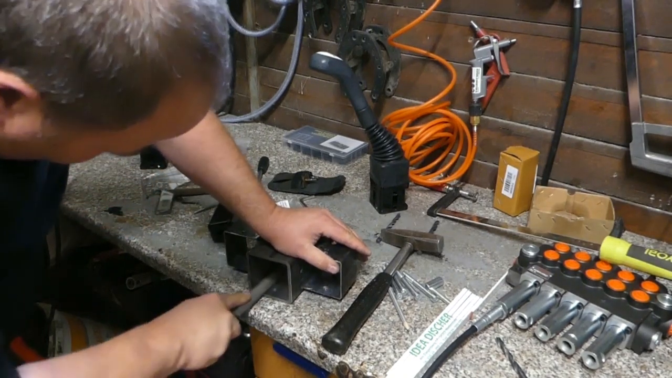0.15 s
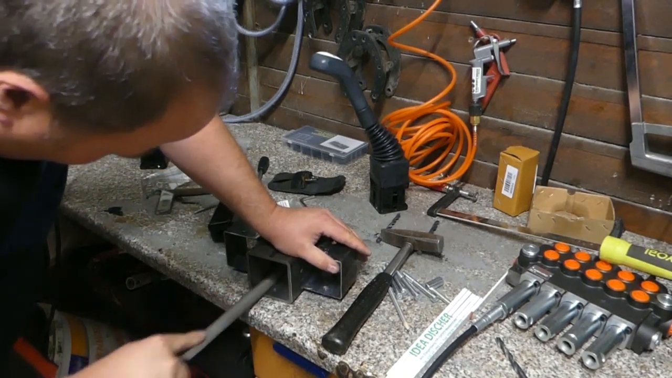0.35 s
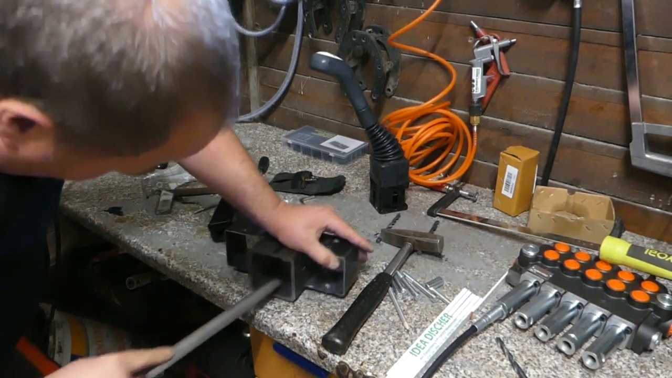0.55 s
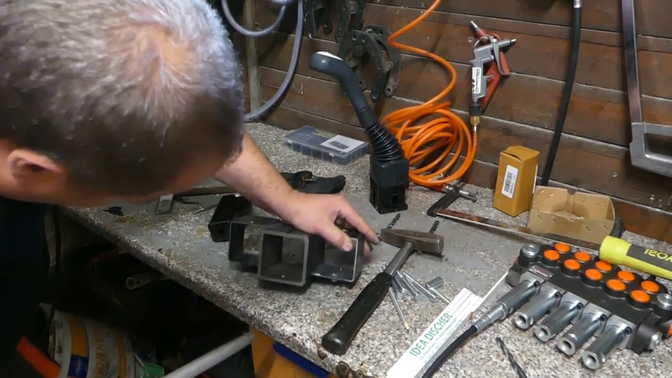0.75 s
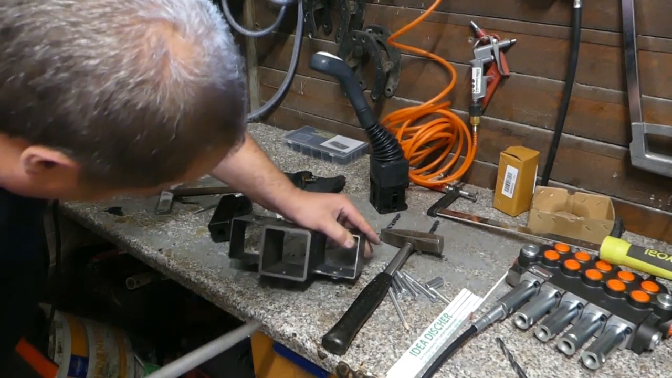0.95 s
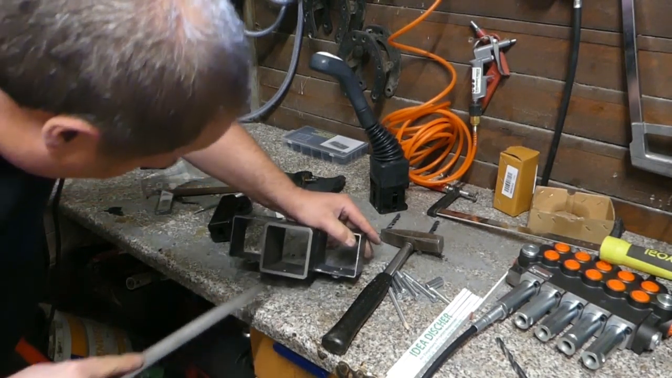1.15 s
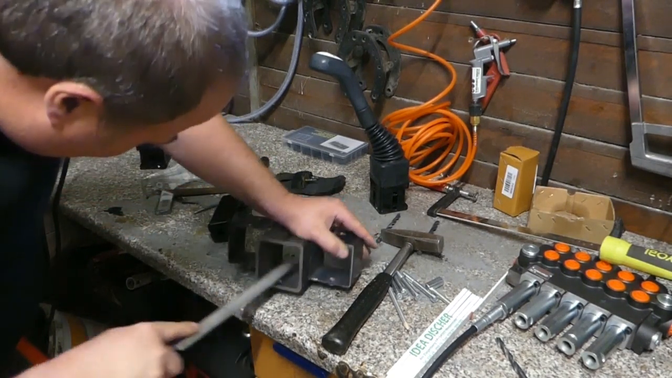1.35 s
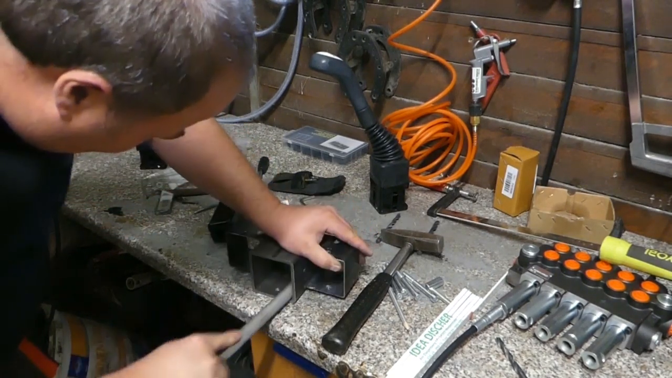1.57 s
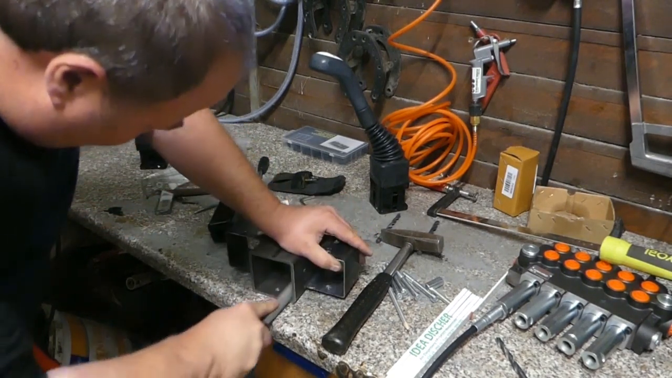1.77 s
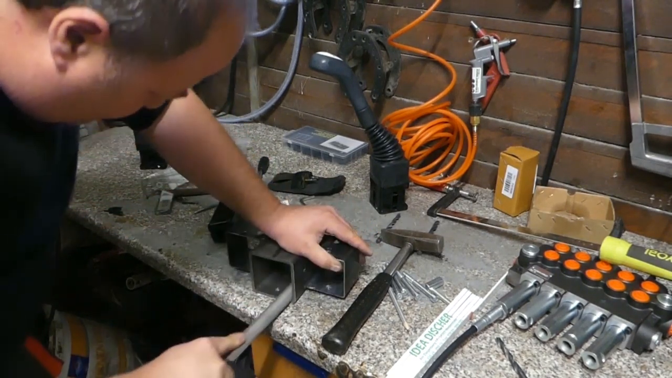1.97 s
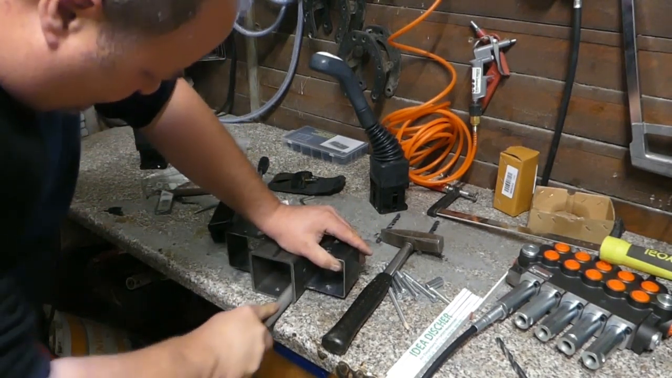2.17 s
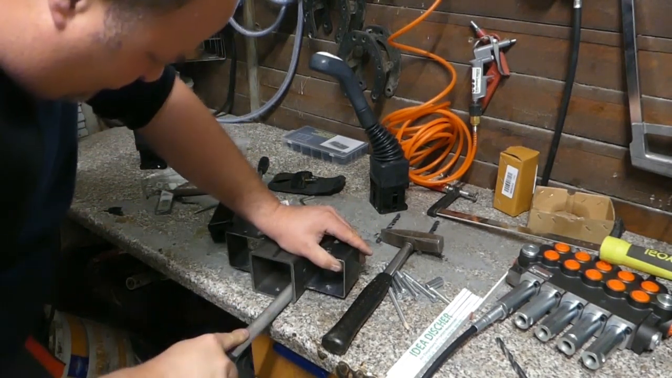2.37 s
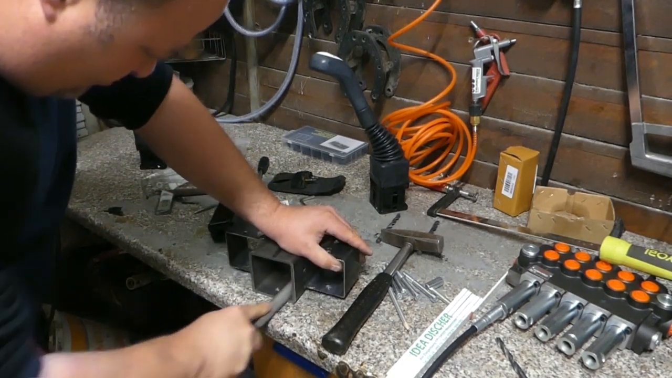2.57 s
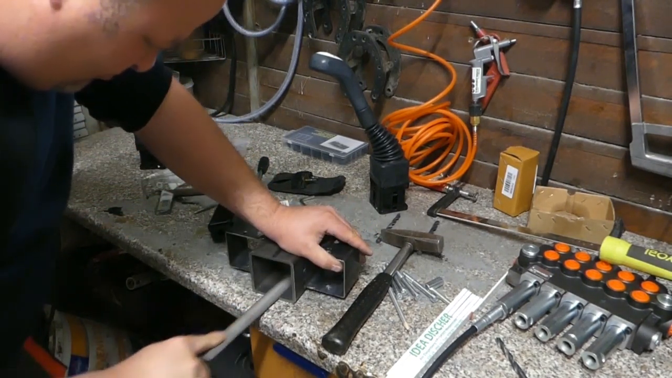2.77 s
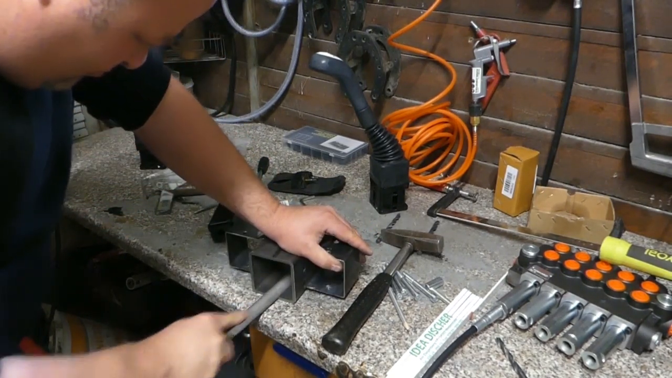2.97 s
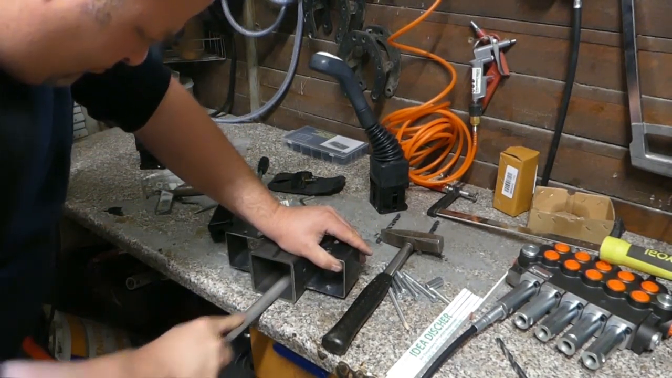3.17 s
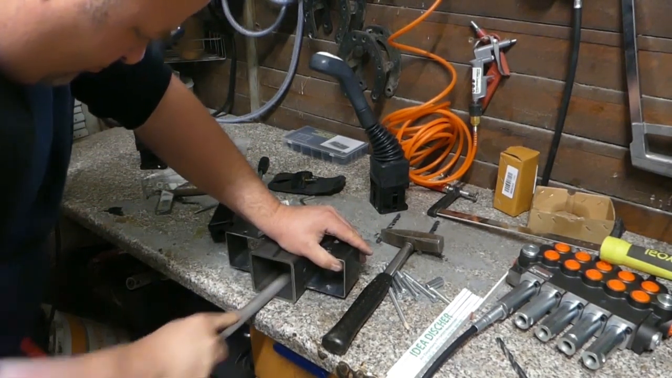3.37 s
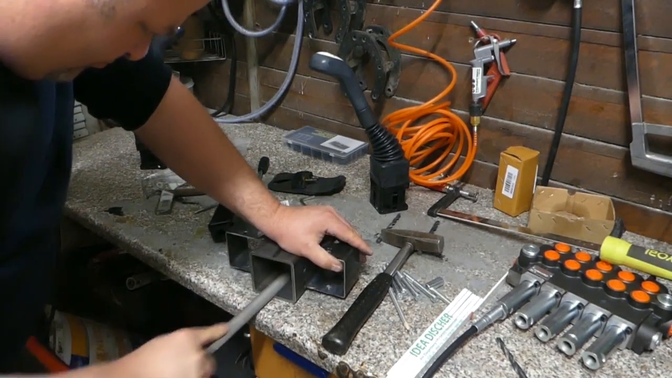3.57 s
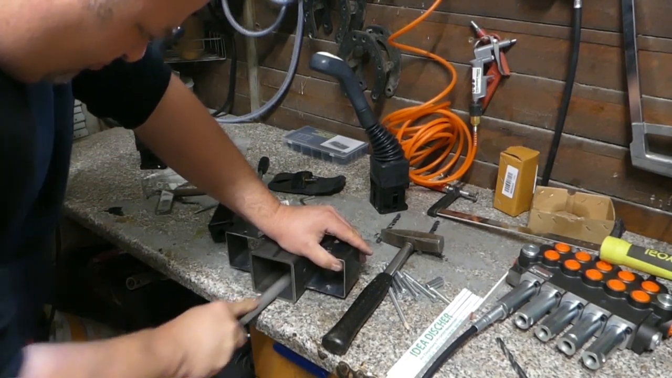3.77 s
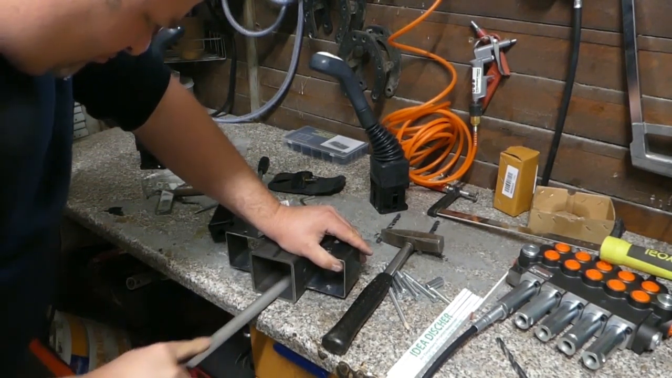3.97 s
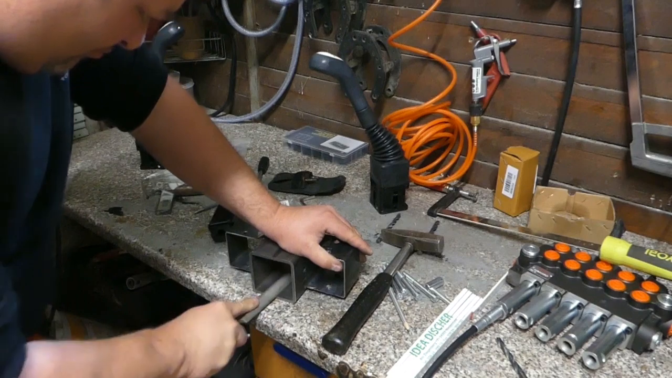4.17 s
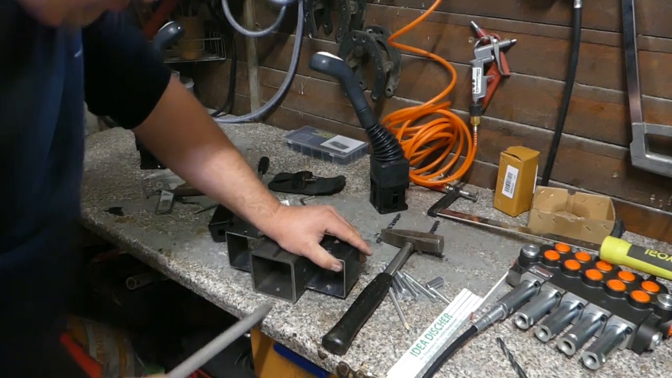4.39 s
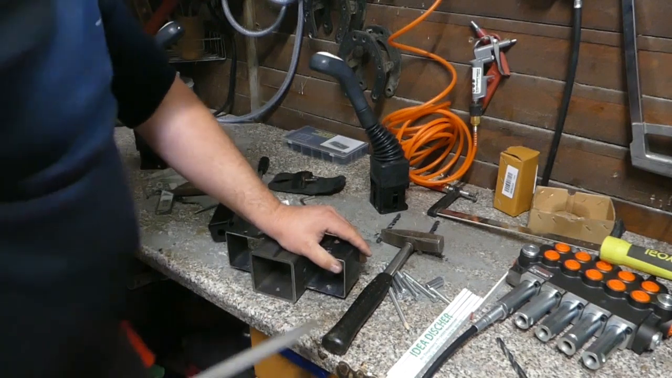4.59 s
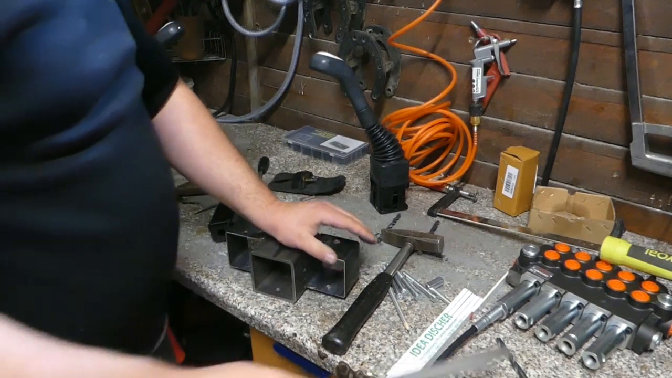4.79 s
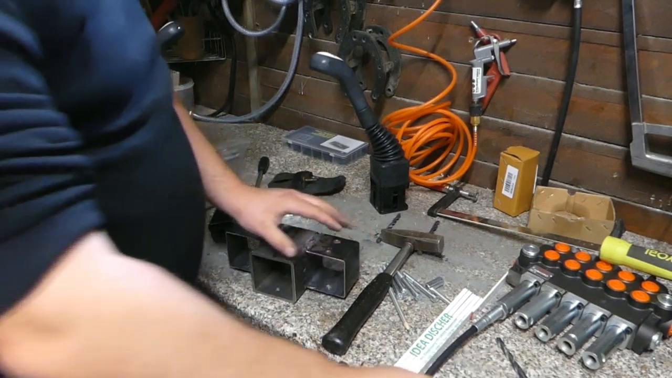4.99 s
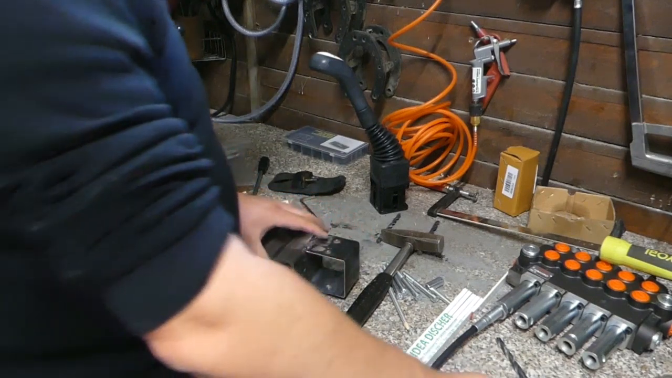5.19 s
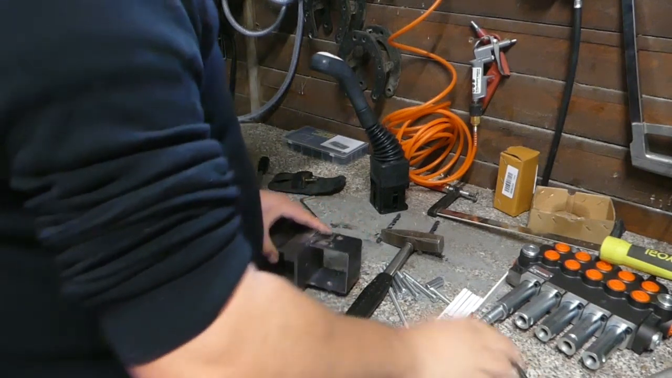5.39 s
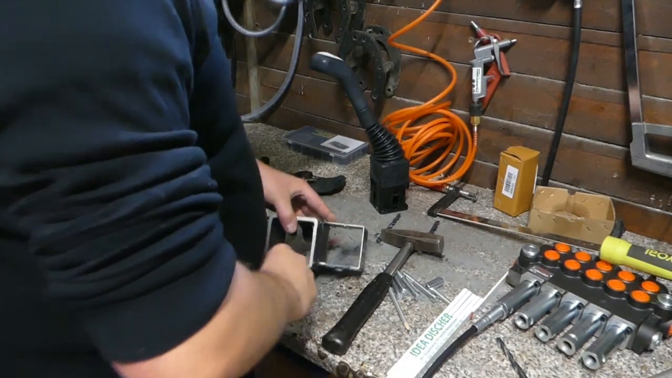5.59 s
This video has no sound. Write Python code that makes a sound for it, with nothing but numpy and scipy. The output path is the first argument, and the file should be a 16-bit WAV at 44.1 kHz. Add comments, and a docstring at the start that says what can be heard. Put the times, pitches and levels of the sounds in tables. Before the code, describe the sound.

Close stereo sound of filing at a workbench: a few harsh strokes, a near-silent gap, a sharp steel clink, then about three seconds of rhythmic bright rasping with gliding squawks and brief squeals. The filing stops with a tap and thin ring. Sleeves rustle, the file is set down with a clatter, and the tube scrapes round and knocks over. Short room echo, faint hum and hiss.

```python
"""Filing a square steel tube

Small workshop, close walls, in stereo: a hand file rasps back and forth inside a tube held on a workbench.
Its teeth, as noise and uneven pulses, chatter at the speed of the stroke and feed the tube's resonances.
The file clinks on the tube, as bursts of contact noise through ringing modes, and its tip slips off at the end.
Then the file is laid down, and the tube is dragged round, juddering, and tipped over on the bench."""
import sys
import numpy as np
from scipy import signal
from scipy.fft import rfft, irfft, next_fast_len
from scipy.io import wavfile
from scipy.ndimage import uniform_filter1d, map_coordinates

SR = 44100
rng = np.random.default_rng(int(sys.argv[2]) if len(sys.argv) > 2 else 0)


def persist_wave(psi):
    """Save psi, clipped to +-1, as 16-bit WAV."""
    counts = np.round(np.clip(psi, -1, 1) * 32767).astype(np.int16)
    wavfile.write(sys.argv[1], SR, np.atleast_2d(counts).T)


N = 248724  # samples

# All table levels are relative: each layer also has a gain where it is mixed.


def amp(db):
    """Amplitude factor of a level in dB."""
    return 10 ** (np.asarray(db) / 20)


def unit(x):
    """x scaled to an RMS of one."""
    return x / np.sqrt(np.mean(x ** 2) + 1e-20)


def along(points, hz):
    """Reads (Hz, value) points on a log frequency axis."""
    f, v = np.transpose(points)
    return np.interp(np.log(hz + 1), np.log(f + 1), v)


def wobble(rate):
    """A smooth random curve, rate knots a second."""
    knots = rng.standard_normal(int(N * rate / SR) + 4)
    return map_coordinates(knots, [np.arange(N) * rate / SR], order=2)


def filtered(x, response):
    """x with its spectrum multiplied by a response of frequency."""
    m = next_fast_len(N + SR // 2)
    return irfft(rfft(x, m) * response(np.fft.rfftfreq(m, 1 / SR)), m)[..., :N]


def coloured(x, points):
    """Causal (minimum-phase) filter of unit energy with the given spectrum."""
    size = 4096
    cepstrum = irfft(np.log(amp(along(points, np.fft.rfftfreq(size, 1 / SR)))))
    # folding the cepstrum forward puts the energy at the start of the kernel
    cepstrum[1:size // 2] *= 2
    cepstrum[size // 2 + 1:] = 0
    kernel = irfft(np.exp(rfft(cepstrum)))
    return signal.fftconvolve(x, kernel / np.linalg.norm(kernel))[:N]


def mode(x, hz, width):
    """One resonance with a peak gain of one; width in Hz."""
    return signal.lfilter(*signal.iirpeak(hz, hz / width, SR), x)


def bank_power(modes):
    """Approximate power of white noise through (Hz, width Hz, dB) resonances."""
    return sum(amp(db) ** 2 * np.pi * width / SR for hz, width, db in modes)


def resonate(x, modes):
    """A bank of resonances with alternating signs that keeps the power of white noise."""
    ringing = sum((-1) ** k * amp(db) * mode(x, hz, width) for k, (hz, width, db) in enumerate(modes))
    return ringing / np.sqrt(bank_power(modes))


def rubbed(x, modes, wander_db):
    """As the contact point travels, each mode is fed more or less from moment to moment."""
    ringing = sum(amp(db) * mode(x * amp(wander_db * wobble(8.7)), hz, width) for hz, width, db in modes)
    return ringing / np.sqrt(bank_power(modes))


def sustained(x):
    """Friction feeds a weak ring and damps a strong one, which evens out its strength."""
    power = np.abs(uniform_filter1d(x ** 2, size=1500)) + 1e-9
    return unit(x / power ** .3)


def pulses(rate, jitter, scatter_db):
    """One uneven pulse each time the running count passes a whole number."""
    count = np.cumsum(rate * np.exp(jitter * wobble(350))) / SR
    at = np.flatnonzero(np.diff(np.floor(count)))
    train = np.zeros(N)
    train[at] = amp(scatter_db * rng.standard_normal(N)[at]) / np.sqrt(rate[at])
    return unit(train - uniform_filter1d(train, SR // 100))


def grit(rough_db):
    """Noise that comes in tiny irregular bursts."""
    return unit(rng.standard_normal(N) * amp(rough_db * (wobble(900) + wobble(140))))


def blows(rows, t60, push):
    """For each (s, dB) row, a clean push and a short burst of contact noise that fades 60 dB in t60 seconds."""
    force, t = np.zeros(N + SR), np.arange(SR // 3) / SR
    for s, db in rows:
        fade = amp(db - 60 * t / t60)
        force[round(s * SR):][:len(t)] += fade * rng.standard_normal(len(t))
        force[round(s * SR)] += push * np.linalg.norm(fade)
    return force[:N] / np.hypot(1, push)


def swing(start, rise, fall):
    """An arm's speed, 0 to 1 and back: a quarter sine up, a quarter sine down."""
    ramp = np.interp(np.arange(N) / SR, [start, start + rise, start + rise + fall], [0, 1, 0])
    return np.sin(np.pi / 2 * ramp)


# spectrum of the workshop air: [f/Hz, level/dB]
AIR_COLOUR = [(25, -49), (60, -37), (120, -23), (180, 3.5), (225, -13), (270, -3), (420, -13.5),
              (800, -19.5), (3000, -31), (16000, -35.5)]


def background():
    """The workshop's low steady drone and faint hiss: coloured noise spread over both channels."""
    mid, side = (coloured(rng.standard_normal(N), AIR_COLOUR) for _ in range(2))
    return amp(-53) * (mid + amp(-2.5) * side * np.array([[1], [-1]]))


# how long the room rings: [f/Hz, t60/s]
ROOM_T60 = [(100, 0.88), (500, 0.46), (2500, 0.5), (6000, 0.32), (14000, 0.25)]
# stereo width of the room echo: [f/Hz, side-against-mid level/dB]
ROOM_WIDTH = [(100, 0), (250, -12.5), (700, -5.5), (2200, -5), (4200, -8.5), (8000, -13.5), (13000, 0.5)]


def workshop(x):
    """Close walls answer at once; each frequency dies at its own speed, nearly alike in both ears."""
    hz, t, z = signal.stft(rng.standard_normal((2, SR * 2 // 3)), SR, nperseg=256)
    fade = amp(-60 * t / along(ROOM_T60, hz)[:, None])
    tail = signal.istft(z * fade, SR, nperseg=256)[1]
    tail = tail / np.linalg.norm(tail[0])
    delayed = np.pad(x, (SR // 300, 0))  # 1/300 s to the first echo
    mid, side = signal.fftconvolve(delayed[None], tail, axes=1)[:, :N]
    return mid + filtered(side, lambda hz: amp(along(ROOM_WIDTH, hz))) * np.array([[1], [-1]])


# hands and sleeves moving: [start t/s, rise t/s, fall t/s, level/dB]
RUSTLE_MOVES = [(.87, 0.025, .06, -60), (1.2, 0.39, .04, -60), (4.78, 0.12, 0.074, -50),
                (4.97, 0.026, 0.14, -51.5), (5.14, 0.032, 0.086, -48.5)]
# spectrum of the rustle: [f/Hz, level/dB]
RUSTLE_COLOUR = [(200, -27), (500, -19), (1100, -2.5), (4600, -5.5), (15000, -16)]


def handling():
    """A soft rustle of hands and sleeves, as bursty noise, between and after the strokes."""
    level = sum(amp(db) * swing(s, rise, fall) for s, rise, fall, db in RUSTLE_MOVES)
    return amp(-2) * level * coloured(grit(rough_db=0.5), RUSTLE_COLOUR)


# tube shoved round on the bench: [t/s, level/dB, judder f/Hz]
TUBE_SHOVES = [(5.139, -42, 640), (5.25, -22.5, 799.3), (5.36, -28.5, 764), (5.493, -23.5, 787.5)]
# spectrum of the drag: [f/Hz, level/dB]
DRAG_COLOUR = [(100, -49), (250, -28), (440, 0), (600, -2.5), (780, -18), (1100, -1), (2000, -25),
               (3400, -41), (5400, -17), (15000, -54)]
SHOVE_ATTACK_S, SHOVE_FADE_DB_PER_S = .02, 96


def sliding():
    """Each shove starts the tube juddering over the gritty bench top, then dies away."""
    t = np.arange(N) / SR

    def shove(s, db):
        attack = np.clip((t - s) / SHOVE_ATTACK_S, 0, 1)
        return attack * amp(db - SHOVE_FADE_DB_PER_S * np.maximum(t - s - SHOVE_ATTACK_S, 0))

    shoves = np.array([shove(s, db) for s, db, _ in TUBE_SHOVES])
    # the strongest shove sets the judder
    judder_hz = np.array([hz for _, _, hz in TUBE_SHOVES])[shoves.argmax(axis=0)]
    judder = unit(mode(pulses(judder_hz, jitter=0.055, scatter_db=4.0), 800, 223))
    scrape = coloured(grit(rough_db=-5.0), DRAG_COLOUR)
    return shoves.max(axis=0) * (amp(-5) * scrape + amp(-3.5) * judder)


# tube knocks on the bench: [t/s, dull thud level/dB, hard clack level/dB]
BENCH_KNOCKS = [(.437, -28.5, -22.5), (1.337, -36, -45), (1.557, -18.5, -22.5), (1.567, -17, -17.5),
                (1.621, -24, -45), (2.747, -48, -22.5), (5.148, -40, -60), (5.481, -19.5, -12.5),
                (5.486, -14, -9.5), (5.514, -38, -11), (5.539, -29, -14), (5.57, -28, -16.5),
                (5.587, -32, -22.5)]
# spectra of the thud and of the clack: [f/Hz, level/dB]
THUD_COLOUR = [(40, -44.5), (90, -15), (170, 3), (330, 1), (520, 4), (900, -21), (1600, -24), (3000, -48),
               (8000, -56), (16000, -75)]
CLACK_COLOUR = [(80, -39), (170, -20), (250, -5), (430, 3), (600, -2.5), (800, 8.5), (1300, 0.5),
                (2300, -6), (3500, -17), (6000, -26.5), (10000, -30.5), (16000, -44)]


def knocks():
    """The tube's edges drop on the bench top, which answers with a thud."""
    thuds = [(s, db) for s, db, _ in BENCH_KNOCKS]
    clacks = [(s, db) for s, _, db in BENCH_KNOCKS]
    thud = coloured(blows(thuds, t60=0.046, push=0.41), THUD_COLOUR)
    clack = coloured(blows(clacks, t60=0.026, push=0.45), CLACK_COLOUR)
    return thud + clack


# file laid down: [t/s, level/dB]
LANDINGS = [(5.25, -12.5)]
# modes of blade and bench together: [f/Hz, width/Hz, level/dB]
BLADE_MODES = [(812, 16, 2), (1084, 42, -9), (1470, 380, -11.5), (2920, 300, -13.5), (4160, 120.6, -5),
               (5330, 100, -5), (6850, 170, -8), (8120, 50, -11), (9480, 80, -15)]
# spectrum of the hard crack of file on bench or tube: [f/Hz, level/dB]
CRACK_COLOUR = [(150, -22), (500, -4.5), (1500, -18), (2400, -21), (4200, 7), (7000, -0.5), (9000, 0),
                (13000, -8), (16000, -12)]


def file_laid_down():
    """The blade lands on the bench with a brief clatter: contact noise into the modes of blade and bench."""
    ring = amp(5) * resonate(blows(LANDINGS, t60=0.028, push=0.45), BLADE_MODES)
    crack = amp(-8) * coloured(blows(LANDINGS, t60=0.039, push=0.067), CRACK_COLOUR)
    return ring + crack + amp(-10) * coloured(blows(LANDINGS, t60=0.14, push=0.49), CLACK_COLOUR)


# file tip slips off the tube: [t/s, level/dB]
TIP_RELEASE = [(4.519, -5)]
# modes of that tap: [f/Hz, width/Hz, level/dB]
TIP_MODES = [(460, 67, -7), (880, 40, 4.5), (955, 52, 0.5), (1408, 100, -1.5), (1597, 75, 4.5),
             (2440, 37.3, 4.5)]
FREE_BLADE_HZ = 4652


def release():
    """The tip taps the tube's mouth on its way out; the freed blade rings on."""
    age = np.maximum(np.arange(N) / SR - TIP_RELEASE[0][0], 0)
    blade = amp(-32 - 60 * age / 0.88) * np.sin(2 * np.pi * FREE_BLADE_HZ * age)
    return amp(-2.5) * resonate(blows(TIP_RELEASE, t60=0.025, push=0.93), TIP_MODES) + blade


# high ringing modes of tube and file: [f/Hz, level/dB]
STEEL_RING = [(2891, -49), (3036, -52), (3117, -50), (3510, -49), (3575, -53), (3833, -49), (4107, -50),
              (4355, -50), (4420, -48), (4587, -47), (4651, -45), (4958, -49), (5270, -47), (5690, -46),
              (6379, -48), (6756, -49), (7106, -49), (7617, -57), (8672, -54), (8920, -53), (9098, -50),
              (9410, -57), (11036, -57), (11230, -56), (11773, -58), (12398, -60), (13889, -63)]


def steel_modes():
    """The ringing modes; the higher ones are wider."""
    return [(hz, 8 + hz / 500, db) for hz, db in STEEL_RING]


# file strikes the tube: [t/s, level/dB]
FILE_CLINKS = [(1.5207, -1.5), (1.5304, -12.5), (2.1275, -7.5), (2.1382, -15)]
# broad resonances of the hand-damped tube walls, also rung by the filing: [f/Hz, width/Hz, level/dB]
WALL_MODES = [(2073, 30, -5), (2272, 22, -9), (2355, 26, -1), (2400, 34, -2), (2486, 42, -2)]


def clinks():
    """The file hits the tube: a hard crack, then the walls and the modes ring."""
    crack = amp(-5.0) * coloured(blows(FILE_CLINKS, t60=0.033, push=0.052), CRACK_COLOUR)
    force = blows(FILE_CLINKS, t60=0.017, push=0.59)
    return crack + amp(-15.0) * resonate(force, steel_modes()) + resonate(force, WALL_MODES)


# one mode grips the stroke and squeals briefly: [t/s, half length t/s, f/Hz, width/Hz, level/dB]
SQUEAL_SWELLS = [(0.026, 0.03, 1038, 6.3, -36), (0.147, 0.07, 1250, 3.7, -32), (0.52, 0.1, 3820, 40, -46),
                 (2.966, 0.026, 3480, 7.7, -27), (3.111, 0.017, 3710, 560, -23.5),
                 (3.299, 0.024, 3530, 34.6, -28.5), (3.576, 0.016, 1251, 16.6, -31)]


def squeals():
    """Short swells of a single resonance, fed with noise and evened out."""
    t = np.arange(N) / SR
    total = 0
    for s, half_length, hz, width, db in SQUEAL_SWELLS:
        swell = np.exp(-((t - s) / half_length) ** 2 / 2)
        total = total + amp(db) * swell * sustained(mode(rng.standard_normal(N), hz, width))
    return total


# the teeth catch evenly in a gliding squawk:
# [start t/s, length t/s, from f/Hz, to f/Hz (both before the waver), level/dB]
SQUAWK_GLIDES = [(.32, 0.14, 721, 1175, -21.5), (2.009, 0.096, 989, 1094, -25),
                 (2.708, 0.071, 700, 1109, -22), (2.754, .12, 1380, 1350, -27),
                 (2.934, 0.056, 1336, 1255, -31.5), (2.974, .085, 1077, 782, -24),
                 (3.235, 0.063, 738, 972, -19), (3.282, 0.1114, 1342, 1169, -25),
                 (3.68, .09, 1704, 1300, -23.5), (3.751, .09, 930, 751, -22.5),
                 (4.09, 0.071, 620, 662.4, -29), (4.162, 0.11, 1300, 718, -21.5),
                 (4.336, 0.061, 1050, 1250, -27)]


def squawks():
    """Teeth that catch evenly give a rough tone that swells, glides and fades."""
    t = np.arange(N) / SR
    waver = np.exp(.075 * wobble(450))
    catching = unit(amp(3 * wobble(200) + 2 * wobble(45)))
    tones = 0
    for s, length, from_hz, to_hz, db in SQUAWK_GLIDES:
        glide_hz = np.interp(t, [s, s + length], [from_hz, to_hz])
        tone = np.sqrt(2) * np.sin(2 * np.pi * np.cumsum(glide_hz * waver) / SR)
        tones = tones + amp(db) * swing(s, length / 2, length / 2) * tone
    return catching * tones


# the file leans on the edge and keeps grating: [from t/s, to t/s]
LEANING = [(0.0, .5), (1.56, 4.44)]
LIFT_DB_PER_S = 88  # fade as the file is lifted off


def contact():
    """One while the file leans on the tube, fading as it is lifted."""
    t = np.arange(N) / SR
    return sum((t >= on) * amp(-LIFT_DB_PER_S * np.maximum(t - off, 0)) for on, off in LEANING)


# one row per push or pull of the file; the last only shapes the fade as filing ends:
# [start t/s, speeding up t/s, slowing down t/s, rasp level/dB, tube ring level/dB, chatter level/dB]
FILE_STROKES = [ (-0.04, .025, 0.13, -21, -18.5, -38), (0.11, .087, 0.13, -19.5, -22, -29.5),
                (0.295, .125, 0.092, -23, -18.5, -25), (0.563, .021, 0.11, -36.5, -39, -47),
                (0.755, .035, 0.15, -55, -66, -48.5), (1.661, .075, .17, -23, -15, -29),
                (1.922, .062, 0.13, -20.5, -15.5, -29), (2.124, .025, .16, -22.5, -17.5, -29),
                (2.32, .091, .09, -27.5, -22, -26), (2.526, .041, 0.093, -20.5, -16, -31),
                (2.671, .093, 0.13, -22, -14, -27), (2.892, .056, 0.12, -23, -14, -31),
                (3.06, .058, 0.083, -22, -13.5, -33), (3.225, .084, 0.13, -22, -12, -34),
                (3.422, .05, .157, -22.5, -16, -37), (3.649, .053, 0.16, -19.5, -15.5, -35.5),
                (3.85, .109, 0.12, -22.5, -16, -37), (4.099, .086, 0.11, -20.5, -16.5, -34.5),
                (4.301, .132, 0.11, -21.5, -15, -35), (4.454, .048, 0.17, -31, -31.5, -35), ]
RASP_LAW, RING_LAW, CHATTER_LAW = 1.42, 1, 0.89  # strength goes as speed to this power
REST_RASP_DB, REST_RING_DB, REST_CHATTER_DB = -34, -30.5, -37.5
TOOTH_HZ = 1150  # teeth passing the edge per second at full speed, before jitter
TURN_SHARE = .35  # share of the top tooth rate that is left as the file turns round


def stroking():
    """The file's speed sets the strength of rasp, ring and chatter, and the rate of the teeth."""
    speed = np.array([swing(*row[:3]) for row in FILE_STROKES])
    rasp_db, ring_db, chatter_db = np.transpose(FILE_STROKES)[3:]
    resting = contact()
    rasp = np.hypot(amp(rasp_db) @ speed ** RASP_LAW, amp(REST_RASP_DB) * resting)
    ring = np.hypot(amp(ring_db) @ speed ** RING_LAW, amp(REST_RING_DB) * resting)
    chatter = np.hypot(amp(chatter_db) @ speed ** CHATTER_LAW, amp(REST_CHATTER_DB) * resting)
    tooth_hz = TOOTH_HZ * (TURN_SHARE + (1 - TURN_SHARE) * speed.max(axis=0))
    return rasp, ring, chatter, tooth_hz


def brightened(x, level, hard_db, slope):
    """A harder stroke gains more at the top of the treble than below it."""
    top = filtered(x, lambda hz: np.clip((hz - 8000) / 4000, 0, 1))
    return x + top * ((level / amp(hard_db)) ** slope - 1)


def shimmer(x, t60):
    """The countless high modes of steel, as a short dense ring of fading noise."""
    t = np.arange(SR // 4) / SR
    ring = rng.standard_normal(len(t)) * amp(-60 * t / t60)
    return signal.fftconvolve(x, ring / np.linalg.norm(ring))[:N]


# spectra of the rasp and of the chatter: [f/Hz, level/dB]
RASP_COLOUR = [(900, -46), (1700, -54), (2700, -2.5), (3400, 1), (4600, 4), (5600, 3.5), (7000, -0.5),
               (7800, -8.5), (9100, -3), (10200, -8.5), (11400, -6), (12600, -17), (14200, -15.5),
               (16000, -26)]
CHATTER_COLOUR = [(50, -47), (100, -6), (200, -9), (450, 5.5), (900, 4.5), (1400, 0.5), (1900, -7),
                  (3000, -0.5), (6000, -59)]
# low resonances of the tube on the bench: [f/Hz, width/Hz, level/dB]
BODY_MODES = [(452, 53, -2.5), (616, 8, -8), (782.5, 8.2, -4), (940, 24, 2.5), (1036, 11.4, 1.5),
              (1252.4, 12.2, 12.5)]
FLARE_DB, FLARE_HZ = 1.3, 26.02  # the tube's ring flares and sinks as the file rocks: depth, knots a second


def filing():
    """Teeth catch on the edge and tear off chips: a rasp, the tube's ring and a chatter that glides with speed."""
    rasp, ring, chatter, tooth_hz = stroking()
    teeth = pulses(tooth_hz, jitter=.06, scatter_db=1.5)

    def bite():
        return unit(grit(rough_db=2.0) + 0.44 * teeth)

    chips = brightened(coloured(rasp * bite(), RASP_COLOUR), rasp, hard_db=-25.5, slope=0.53)
    hiss = amp(-4.0) * chips + amp(-7.5) * shimmer(chips, t60=0.038)
    flare = amp(-5.0 + FLARE_DB * wobble(FLARE_HZ))
    walls = flare * ring * sustained(rubbed(bite(), WALL_MODES, wander_db=6.0))
    # light pressure damps the steel less, so its modes stand out between strokes
    singing = amp(-10.0) * rubbed(rasp ** 0.9 * bite(), steel_modes(), wander_db=3.0)
    shake = chatter * unit(coloured(.5 * teeth + grit(rough_db=3.0), CHATTER_COLOUR))
    squawk = squawks()  # it flares as it crosses a resonance of the tube
    body = resonate(amp(-15) * shake + amp(-17) * squawk, BODY_MODES)
    low = amp(-5.0) * shake + amp(-7.5) * squawk + body
    return hiss + walls + singing + low


def scene():
    """Filing and handling on the bench, a touch right of centre, in the room; the hits excite the room more."""
    strokes = filing() + squeals() + handling()
    hits = clinks() + knocks() + release() + file_laid_down() + sliding()
    direct = amp(-1.5) * (strokes + hits)
    room = workshop(amp(-8.5) * strokes + amp(-3.0) * hits)
    return (direct + room) * amp([[-.35], [.35]]) + background()


TOP_HZ = 15900  # band limit


def record(dry):
    """The camera rounds off the highest peaks and keeps nothing above its band limit."""
    rounded = dry / (1 + np.abs(dry / .85) ** 6) ** (1 / 6)
    return filtered(rounded, lambda hz: hz < TOP_HZ)


dry = scene()
out = record(dry)
persist_wave(out)
```